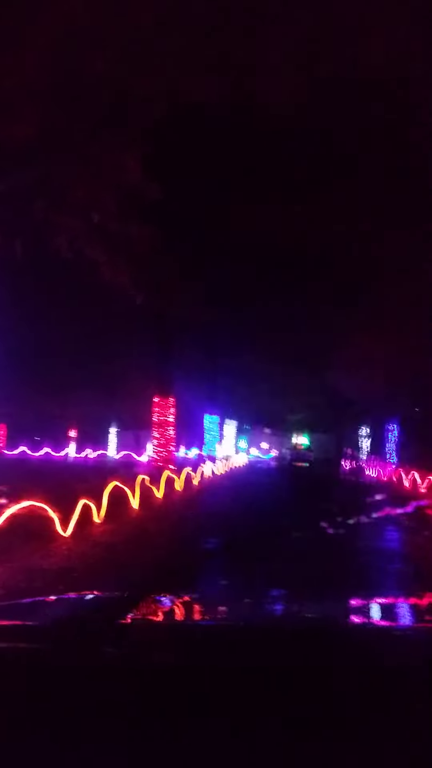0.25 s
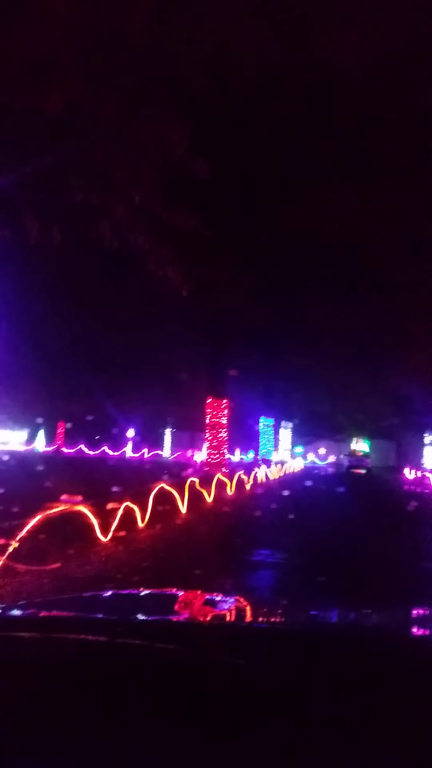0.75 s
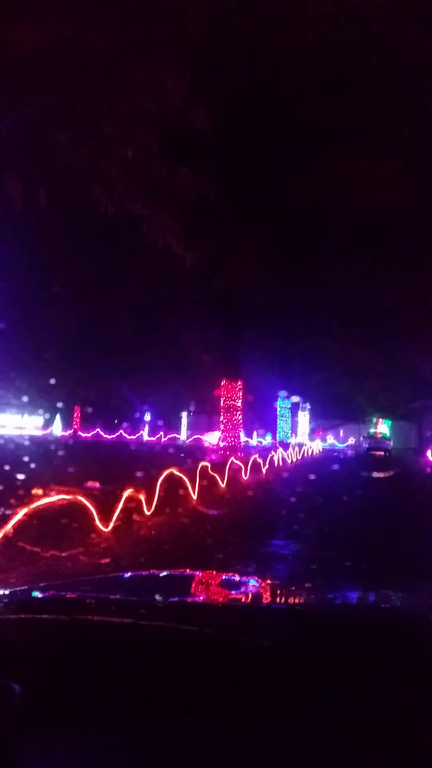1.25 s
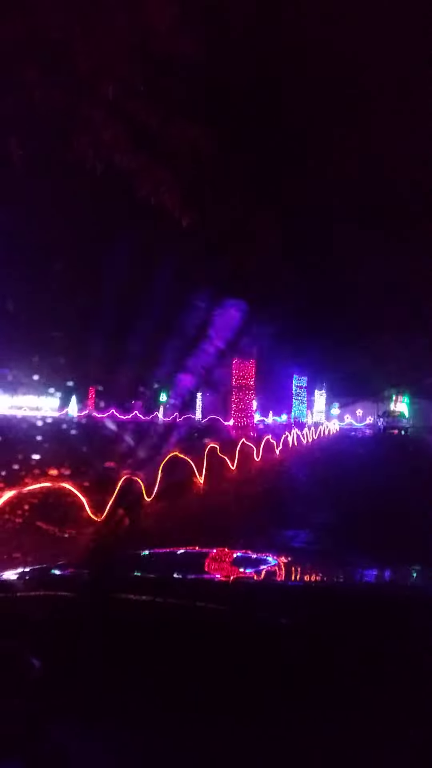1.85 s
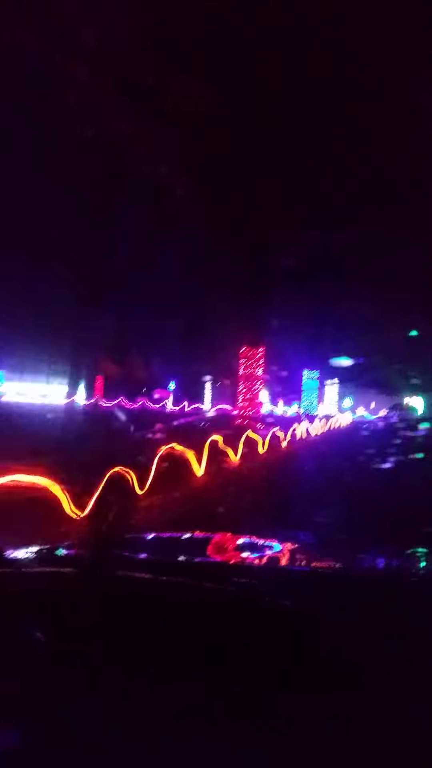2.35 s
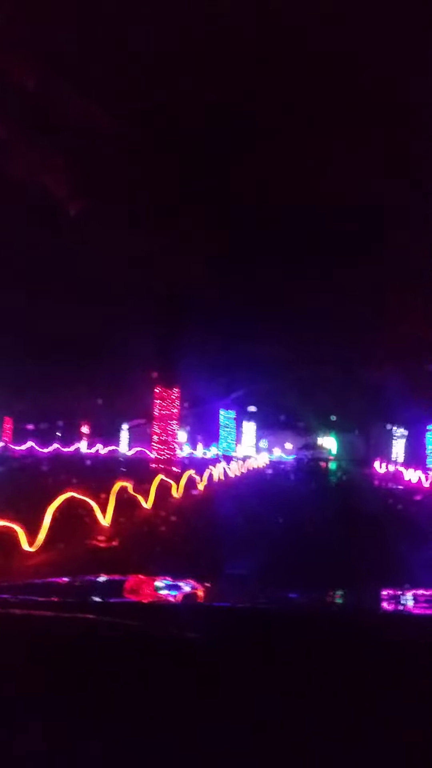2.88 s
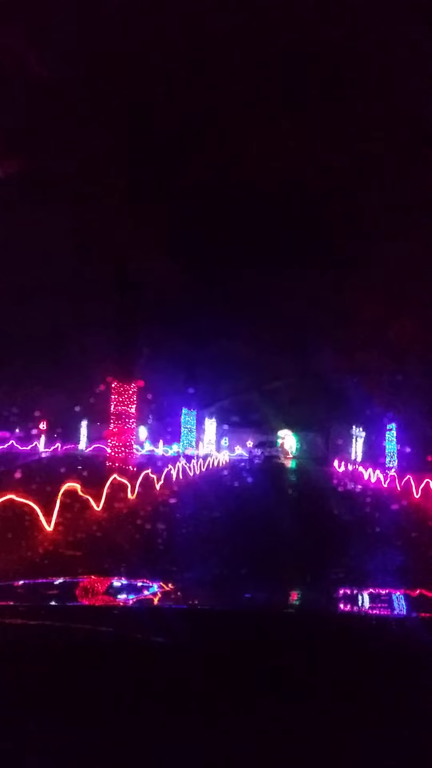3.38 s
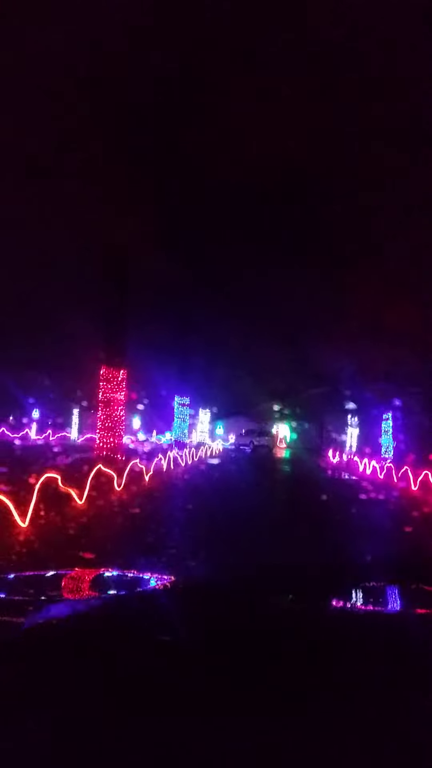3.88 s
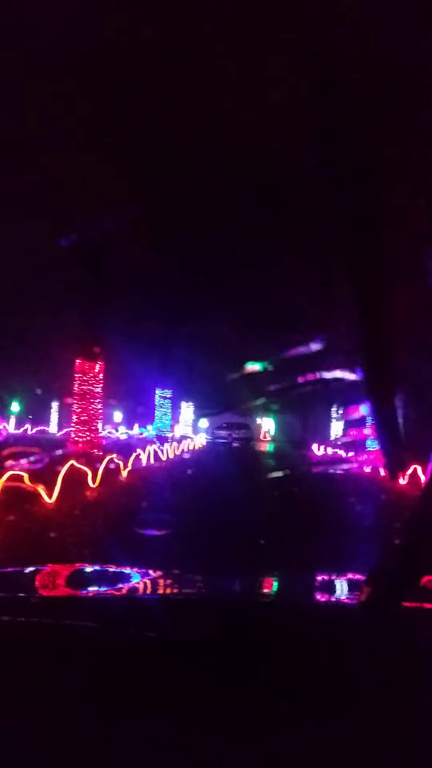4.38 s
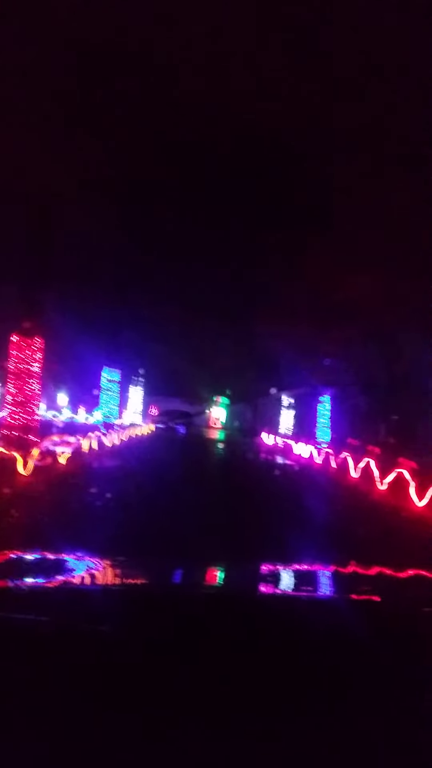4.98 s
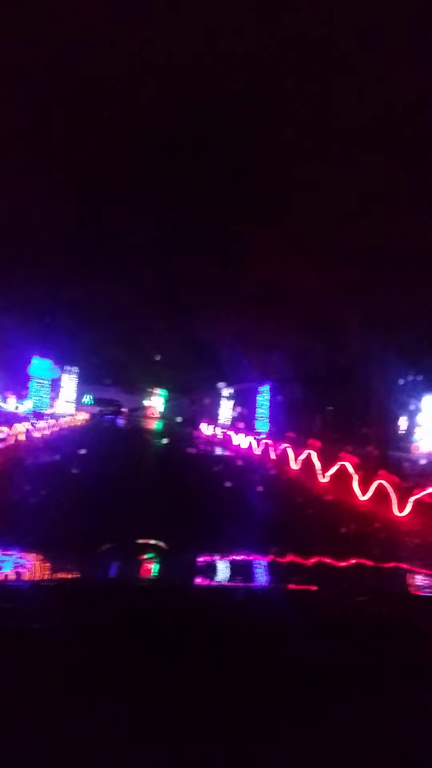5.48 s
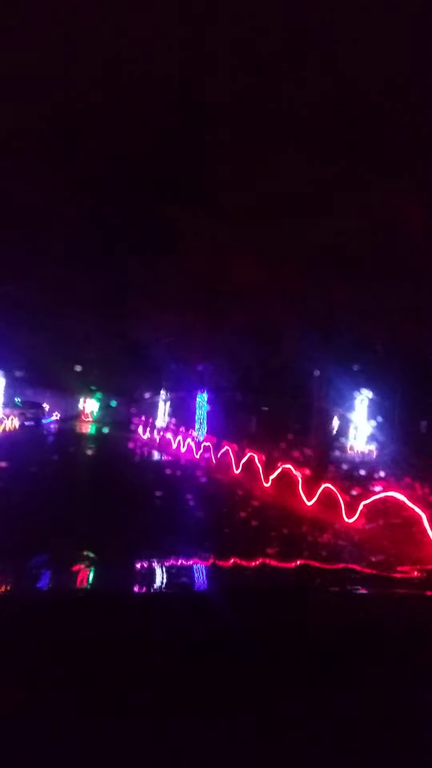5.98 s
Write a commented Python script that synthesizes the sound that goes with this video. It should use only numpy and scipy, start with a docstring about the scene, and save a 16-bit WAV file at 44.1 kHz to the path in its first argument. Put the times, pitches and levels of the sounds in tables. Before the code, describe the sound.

Inside a slowly rolling car in the rain, close and dry, through a small microphone with little deep bass. From 0 s large drops splat irregularly on roof and windscreen, around fifteen to twenty a second, each a tiny spatter with a short thud and panel ring. Fine patter, bright glass ticks and fizz run between them over a faint wash of far rain and road. Around 1.0-1.4 s large hits are sparser. At 1.5 s the wipers groan and sweep low, with dull knocks until 1.7 s and another near 2.0 s. A heavy cluster lands at 2.05-2.2 s, and a strong bright smack at 3.36 s. Wipers groan again at 3.7 s, knocking at 4.2 s. A hollow note rings at 4.6 s, with softer ones near 5.9 s as the wipers set off again. At about 6.1 s a brief gritty swish rises; drops continue to the end at 6.2 s.

```python
"""Large raindrops splat on the roof and windscreen of a slowly rolling car, heard from inside the cabin.
Each is a spatter of noise droplets through thin panels that thud and ring briefly.
Random fine drops patter, tick and fizz between them over a wash of far rain and road.
A few drops ring a hollow note or crack brightly; the wipers groan, sweep and knock softly.
One short swish, noise with two rising resonances, passes near the end."""
import sys
import numpy as np
from scipy import signal
from scipy.fft import rfft, irfft
from scipy.io import wavfile
from scipy.ndimage import uniform_filter1d

SR = 44100
rng = np.random.default_rng(int(sys.argv[2]) if len(sys.argv) > 2 else 0)


def persist_wave(psi):
    """Save psi, clipped to +-1, as 16-bit WAV."""
    counts = np.round(np.clip(psi, -1, 1) * 32767).astype(np.int16)
    wavfile.write(sys.argv[1], SR, np.atleast_2d(counts).T)


def natural_amplitude(level_db):
    """Convert a level in decibels to a linear amplitude factor, elementwise."""
    exponent = np.asarray(level_db, float) / 20
    return 10 ** exponent


N = 274743
SIZE = 16384  # samples in one drop's response
HZ = np.fft.rfftfreq(SIZE, 1 / SR)


def unit_rms(x):
    """Scales to rms 1."""
    return x / np.sqrt(np.mean(x ** 2) + 1e-20)


def read_spectrum(points, hz):
    """Reads a table along a log-frequency axis."""
    table_hz, value = np.transpose(points)
    return np.interp(np.log(hz + 1), np.log(table_hz + 1), value)


def curves(rows):
    """Reads every column after the time at each sample."""
    start_s, *columns = np.transpose(rows)
    t = np.arange(N) / SR
    return [np.interp(t, start_s, column) for column in columns]


def add(mix, start_s, sound):
    """Mixes a sound in at its start time."""
    part = mix[round(start_s * SR):][:len(sound)]
    part += sound[:len(part)]


def causal(db):
    """Minimum-phase response for a gain in dB, so that nothing sounds before the blow."""
    cepstrum = irfft(np.maximum(db, -100) * np.log(10) / 20)
    cepstrum[1:SIZE // 2] *= 2
    cepstrum[SIZE // 2 + 1:] = 0
    return np.exp(rfft(cepstrum))


def coloured_noise(points):
    """Steady noise of rms 1 with the given spectrum."""
    hz = np.fft.rfftfreq(N, 1 / SR)
    white = rfft(rng.standard_normal(N))
    return unit_rms(irfft(white * natural_amplitude(read_spectrum(points, hz)), N))


def resonate(x, hz, width_hz):
    """Shifts the curve hz down to zero, smooths, and shifts back: a resonance of gain 1."""
    turn = np.exp(2j * np.pi * np.cumsum(hz * np.ones(len(x))) / SR)
    r = np.exp(-np.pi * width_hz / SR)
    return 2 * (turn * signal.lfilter([1 - r], [1, -r], x / turn)).real


def random_hits(per_s, spread_db, most):
    """Scatters hits at random samples; exponential sizes in dB make a few larger than the rest."""
    size = natural_amplitude(spread_db * np.minimum(rng.exponential(1, N), most))
    return size * (rng.random(N) < per_s / SR)


# how long the dense ring of a panel lasts: pitch_hz [Hz], t60_s [s]
RING_DECAY = [(150, 0.13), (400, 0.27), (1000, 0.099), (2800, 0.047), (7300, 0.061), (15000, 0.071)]
# low modes of the roof: pitch_hz [Hz], level_db [dB], t60_s [s]
ROOF_MODES = [(137, -7, 0.069), (249, -4.5, 0.13), (398.7, -5, 0.37), (460, 7, 0.058), (716, 9.5, 0.071),
              (813, 11, 0.042)]


def spots(count, direct_db, modes_db):
    """How each spot of the car answers a tap: direct tick, dense ring dying by band, low roof modes."""
    t = np.arange(SIZE) / SR
    hz, frame_s, z = signal.stft(rng.standard_normal((count, SIZE)), SR, nperseg=128)
    t60_s = read_spectrum(RING_DECAY, hz)[:, None]
    dying = z * natural_amplitude(-60 * frame_s / t60_s) / np.sqrt(t60_s)
    answer = signal.istft(dying, SR, nperseg=128)[1][:, :SIZE]
    answer *= 1 - np.exp(-t / 0.0012)  # the ring swells in behind the tick
    answer /= np.linalg.norm(answer, axis=1, keepdims=True)
    answer[:, 0] += natural_amplitude(direct_db)
    for pitch_hz, level_db, mode_t60_s in ROOF_MODES:
        # every spot drives the mode differently and hears it slightly detuned
        share, detune = rng.standard_normal((count, 2)).T[:, :, None]
        fade = natural_amplitude(modes_db + level_db - 60 * t / mode_t60_s)
        answer += share * fade * np.sin(2 * np.pi * pitch_hz * (1 + 0.036 * detune) * t)
    answer[:, SIZE // 2:] = 0
    return rfft(answer)


# fine drops between the large ones: start_s [s], level_db [dB]
PATTER = [(0.0, -43), (0.62, -47.5), (0.78, -45.5), (1.23, -45.5), (1.37, -43.5), (2.15, -45),
          (2.27, -45.5), (3.35, -49.5), (3.45, -53.5), (3.57, -50), (3.71, -45.5), (3.8, -48.5),
          (4.53, -45), (4.68, -47.5), (4.94, -49.5), (5.21, -50), (6.0, -45.5), (6.23, -47)]
# colour of a drop through panel and cabin: pitch_hz [Hz], level_db [dB per Hz]
PANEL = [(35, -41), (60, -66.5), (118, -15.5), (248, -0.5), (435, 3), (588, -4), (760, -1.5), (982, -4),
         (1130, 0), (2220, 2), (2700, -9), (4790, -16.5), (6950, -27), (8200, -29), (15700, -34)]


def patter(answers):
    """Many small drops hit at random moments and spots, each spot with its own brightness."""
    hits = random_hits(per_s=600, spread_db=5.5, most=4)
    spot = rng.integers(0, len(answers), N)
    tilts_db_per_octave = np.linspace(-2.25, 2.25, len(answers))
    panel_db = read_spectrum(PANEL, HZ)
    octaves = np.log2((HZ + 100) / 1500)
    taps = np.zeros(N)
    for k, answer in enumerate(answers):
        response = irfft(answer * causal(panel_db + tilts_db_per_octave[k] * octaves))
        taps += signal.oaconvolve(hits * (spot == k), response)[:N]
    level_db, = curves(PATTER)
    return natural_amplitude(level_db) * unit_rms(taps)


# far rain and road: pitch_hz [Hz], level_db [dB per Hz]
WASH = [(35, -61), (60, -6), (237, 16), (435, 7), (982, 5), (2020, -19), (2440, -18), (4900, -29),
        (7800, -19.5), (15700, -14.5)]


def far_wash():
    """Far rain and road blur into steady coloured noise."""
    return natural_amplitude(-55.5) * coloured_noise(WASH)


# drifting top of the fizz: start_s [s], pitch_hz [Hz]
FIZZ_TOP = [(0, 4940), (2.4, 4730), (4.6, 5800), (6.23, 5700)]


def fizz():
    """The finest drops fizz in clumps on wet glass: short noise tails through two wide resonances."""
    clumps = natural_amplitude(3.0 * unit_rms(uniform_filter1d(rng.standard_normal(N), size=900)))
    hits = clumps * random_hits(per_s=500, spread_db=4.0, most=4)
    t = np.arange(SIZE // 4) / SR
    kind = rng.integers(0, 8, N)
    tails = rng.standard_normal((8, len(t))) * natural_amplitude(-60 * t / 0.06)  # t60 60 ms
    splashes = sum(signal.oaconvolve(hits * (kind == k), tail)[:N] for k, tail in enumerate(tails))
    top_hz, = curves(FIZZ_TOP)
    upper = lower = splashes
    for _ in range(3):  # three passes steepen each resonance
        upper = resonate(upper, top_hz, 1700)
        lower = resonate(lower, 2900, 1900)
    return natural_amplitude(-60.5) * unit_rms(upper + 2.24 * lower)


# modes of the windscreen: pitch_hz [Hz], level_db [dB], t60_s [s]
GLASS_MODES = [(2873, 6.5, 0.025), (3700, -29, 0.0088), (4750, 6, 0.015), (5000, 1.5, 0.014),
               (6000, -11, .008)]


def glass_ticks():
    """Small drops on the windscreen give short bright ticks, each favouring other modes."""
    hits = random_hits(per_s=91, spread_db=9, most=3)
    t = np.arange(SIZE // 8) / SR
    ticks = np.zeros(N)
    for pitch_hz, level_db, t60_s in GLASS_MODES:
        mode = natural_amplitude(level_db - 60 * t / t60_s) * np.sin(2 * np.pi * pitch_hz * t)
        ticks += signal.oaconvolve(hits * rng.standard_normal(N), mode)[:N]
    return natural_amplitude(-61) * unit_rms(ticks)


# large drops: start_s [s], tap_db [dB], thud_db [dB, under 700 Hz], splash_db [dB, over 3.5 kHz],
# length_ms [ms, length of the splat]
DROPS = [(0.053, -42.5, -42, -51, 9.7), (0.084, -50, -78, -65, 8.1), (0.11, -45, -66, -55, 4.9),
         (0.156, -38.5, -59, -41, 1.77), (0.192, -43, -48.5, -53, 27), (0.28, -44, -49, -52, 3.9),
         (0.313, -34.5, -48, -44.5, 6.9), (0.355, -42.5, -43.5, -49.5, 14.7),
         (0.438, -45.5, -54, -52, 1.66), (0.483, -42, -71, -62, 7.1), (0.501, -77, -54, -46.5, 0.55),
         (0.551, -35.0, -40.5, -43.5, 1.9), (0.586, -45, -55, -51, 4.6), (0.624, -45, -52, -54, 2.2),
         (0.638, -45, -52, -55, 25), (0.698, -53, -64, -57, 2), (0.765, -37.5, -46, -45.5, 3.7),
         (0.823, -36, -42, -50, 2.7), (0.862, -45, -40.5, -48, 2.1), (0.881, -37.5, -52, -48, 4.7),
         (0.93, -35.5, -49, -46.5, 3.46), (0.987, -39.5, -52, -47.5, 1.2), (1.001, -44, -48, -52, 15),
         (1.155, -45, -63, -56, 24), (1.165, -50, -50, -58, 1.2), (1.403, -37.5, -48, -46.5, 14.3),
         (1.439, -46, -44, -52, 10.2), (1.457, -32.5, -41, -43.5, 7.7), (1.541, -49, -65, -62, 1.4),
         (1.558, -47.5, -63, -49, 1.8), (1.631, -34.5, -39, -45, 9.8), (1.705, -44.5, -49, -61, 16),
         (1.743, -37, -52, -46.5, 11), (1.857, -57, -65, -59, 1.5), (1.891, -41, -47, -49.5, 1.1),
         (1.949, -41.5, -40, -50, 28), (2.009, -43, -50, -54, 11), (2.031, -45, -53, -59.0, 12),
         (2.058, -33.5, -41, -41.5, 12), (2.085, -35.5, -46.5, -42.5, 8.5),
         (2.102, -30.5, -35.5, -40.5, 5.6), (2.175, -33, -39, -47.5, 7.6), (2.22, -39, -42.5, -50, 8.2),
         (2.287, -52, -55, -60, 1.5), (2.316, -43.5, -51.5, -56, 4.8), (2.487, -34.5, -43.5, -44.0, 10.5),
         (2.555, -50, -44.5, -43.5, 3.7), (2.604, -44.5, -46, -51, 4.8), (2.64, -39.5, -40, -56, 4.4),
         (2.7, -35.5, -46, -49.5, 6), (2.827, -50, -59, -54, 2.3), (2.846, -40.5, -51, -50.0, 12.3),
         (2.881, -41, -46, -52, 4), (2.894, -36.5, -41.5, -46.5, 1.93), (2.942, -35, -40.5, -42, 1.1),
         (3.142, -40.0, -44, -52, 11.6), (3.186, -50, -54, -53.5, 1.4), (3.222, -45.5, -49, -49.5, 13),
         (3.285, -43.5, -49, -53.5, 8.1), (3.362, -28, -36, -39.5, 5.2), (3.407, -35.5, -38.5, -43, 9.3),
         (3.459, -43.5, -45, -51.5, 2.1), (3.496, -34, -43, -42, 7.8), (3.614, -40, -44, -58, 24),
         (3.619, -44, -52, -56, 14), (3.661, -40.5, -42, -52.5, 7.3), (3.707, -40, -41.5, -44.5, 8),
         (3.733, -36.5, -49.5, -48.5, 4.4), (3.759, -47, -45, -57, 6.4), (3.827, -43, -43.5, -52, 1.1),
         (3.838, -39.5, -51, -49, 17), (3.928, -33.0, -37, -40.5, 6.1), (3.964, -40, -48, -52, 21),
         (4.086, -35.5, -41.5, -41.5, 5.5), (4.137, -41, -40, -45.5, 2), (4.178, -41, -44, -52, 10.3),
         (4.398, -54, -48, -55, 1), (4.429, -37.5, -40.5, -48.5, 0.92), (4.471, -41, -48, -48, 8.4),
         (4.513, -34.5, -39.5, -43.5, 3), (4.6, -30, -37.5, -47.5, 4.5), (4.628, -46, -41, -46.5, 2.4),
         (4.662, -40.5, -62.0, -49, 2.9), (4.686, -51, -46, -47.0, 0.22), (4.702, -37, -49.5, -47, 2.1),
         (4.739, -46, -48, -55, 9.1), (4.778, -38.5, -65, -52, 1.3), (4.804, -39.5, -48.5, -51, 12.6),
         (4.831, -43, -50, -53, 4.7), (4.882, -38, -42, -49, 7.2), (4.916, -41.5, -50, -46, 1.32),
         (4.93, -45.5, -51, -50, 2.6), (4.967, -34.5, -46.5, -45, 1.2), (5.004, -39.5, -43, -50, 29),
         (5.055, -35.5, -42.5, -49.5, 8.2), (5.108, -43, -56, -54, 8.8), (5.136, -32.5, -39, -44.5, 9.3),
         (5.228, -45.5, -74, -50.5, 19), (5.267, -53, -60, -58, 2.3), (5.286, -64, -70, -54, 1.6),
         (5.4, -38, -43, -47.5, 1.5), (5.434, -42.5, -45, -47.5, 1.5), (5.467, -34.5, -45, -42.5, 14.7),
         (5.503, -37.5, -51, -46, 7.4), (5.64, -44, -45, -44.5, 0.7), (5.735, -37, -44.5, -46, 9.8),
         (5.802, -45.5, -55, -55, 13), (5.92, -34, -37.5, -45.5, 7.1), (5.924, -42, -49.5, -49.5, 20),
         (6.019, -53, -58, -54, 0.92), (6.105, -33.5, -52, -46, 0.97), (6.151, -42, -48, -64, 9.9),
         (6.214, -34, -39.5, -43.5, 6.3)]


def large_drops(answers):
    """Each drop lands as a spatter of droplets; tap, thud and splash keep their own levels."""
    lead_share = 0.35  # share of the splat that lands before the main body of water
    sharp_db, sharp_ms = -2.5, 3.2  # the shortest drops are mostly one clean tick
    t_ms, out = np.arange(SIZE) / SR * 1000, np.zeros(N)
    low = causal(-10 * np.log10(1 + (HZ / 700) ** 8))
    high = causal(-10 * np.log10(1 + (3500 / (HZ + 1)) ** 8))
    middle = causal(-10 * np.log10((1 + (700 / (HZ + 1)) ** 8) * (1 + (HZ / 3500) ** 8)))
    dull = causal(-10 * np.log10(1 + (HZ / 4500) ** 4))
    panel_db = read_spectrum(PANEL, HZ)
    octaves_up = np.log2(np.maximum(HZ / 6000, 1))
    first_20_ms = slice(0, round(0.02 * SR))  # levels are rms over this stretch
    for k, (start_s, tap_db, thud_db, splash_db, length_ms) in enumerate(DROPS):
        rise_ms, fall_ms = lead_share * length_ms, (1 - lead_share) * length_ms
        after = (t_ms - rise_ms) / np.where(t_ms < rise_ms, rise_ms, fall_ms)
        droplets = rng.standard_normal(SIZE) * natural_amplitude(3.92 * rng.exponential(1, SIZE))
        droplets[round(rise_ms * SR / 1000)] = 11  # the blow of the main body of water
        spatter = rfft(droplets * np.exp(-after ** 2))
        clean_tick = natural_amplitude(sharp_db) * np.exp(-length_ms / sharp_ms) * dull
        struck = spatter * (answers[k % len(answers)] + clean_tick)
        # one smack shakes the panel fairly evenly across the range
        blots_db = 10 * np.log10(uniform_filter1d(abs(struck) ** 2, size=70))
        uneven_db = 0.62 * (blots_db - blots_db.mean())
        # drops with a strong splash also reach further into the top treble
        sparkle_db = 0.076 * (splash_db - tap_db - 12.0) * octaves_up
        struck *= causal(panel_db + sparkle_db - uneven_db)
        tap, thud, splash = [irfft(struck * band) for band in (middle, low, high)]
        splash *= 1 + 1.8 * np.exp(-t_ms / 6.3)  # first contact cracks brightest
        for level_db, part in ((tap_db, tap), (thud_db, thud), (splash_db, splash)):
            add(out, start_s, natural_amplitude(level_db) * part / part[first_20_ms].std())
    return out


# drops on a hollow part of the roof: start_s [s], level_db [dB], pitch_hz [Hz], t60_s [s]
HOLLOW_DROPS = [(0.055, -25.5, 694, 0.04), (4.603, -24.5, 430, 0.15), (5.864, -30, 430, 0.076),
                (5.955, -27.5, 425, 0.058)]


def hollow_drops():
    """A hollow part of the roof rings one clear note: a quick rise, then a decay."""
    t, out = np.arange(SIZE) / SR, np.zeros(N)
    rise = 1 - np.exp(-t / 0.00027)
    for start_s, level_db, pitch_hz, t60_s in HOLLOW_DROPS:
        note = np.sin(2 * np.pi * pitch_hz * t)
        add(out, start_s, rise * natural_amplitude(level_db - 60 * t / t60_s) * note)
    return out


# hard drops near the microphone: start_s [s], level_db [dB, noise rms at the onset]
CRACKS = [(0.156, -40), (0.55, -40), (0.765, -43), (0.93, -40), (0.9862, -49), (1.892, -45), (2.0577, -36),
          (2.083, -37), (2.1011, -38), (2.4876, -39), (2.5536, -44), (2.699, -40), (2.9402, -52),
          (3.3622, -35.5), (3.4955, -41), (3.7055, -39), (3.9275, -37.5), (4.0856, -46), (4.4283, -36.5),
          (4.512, -45), (4.9142, -55), (5.3981, -46), (5.4675, -48), (5.639, -50), (6.2133, -42)]


def cracks():
    """Hard drops crack in the top treble: bright noise that starts at once and dies fast."""
    t, out = np.arange(SIZE // 4) / SR, np.zeros(N)
    bright = signal.butter(4, 9800, "high", fs=SR, output="sos")
    fall_db = -60 * t / 0.011  # t60 11 ms
    for start_s, level_db in CRACKS:
        noise = unit_rms(signal.sosfilt(bright, rng.standard_normal(len(t))))
        add(out, start_s, natural_amplitude(level_db + fall_db) * noise)
    return out


# the wipers set off with a groan and sweep on: start_s [s], level_db [dB]
WIPES = [(1.529, -42), (3.72, -41.5), (5.919, -43.5)]


def wiper_rumble():
    """The wiper motor shakes the three lowest roof modes: a quick groan, then a softer sweep."""
    rise_s, fall_db_per_s = 0.0063, 200
    sweep_db, sweep_s, stop_s = -7, 0.2, 0.055  # relative to the groan; hold, then fade constant
    shake, t = rng.standard_normal(N), np.arange(N) / SR
    body, level = np.zeros(N), np.zeros(N)
    for pitch_hz, mode_db, _ in ROOF_MODES[:3]:
        mode = resonate(resonate(shake, pitch_hz, 45), pitch_hz, 45)
        body += natural_amplitude(mode_db) * unit_rms(mode)
    for start_s, level_db in WIPES:
        since = np.maximum(t - start_s, 0)
        rise = np.minimum(since / rise_s, 1)
        groan = natural_amplitude(-fall_db_per_s * since)
        sweep = natural_amplitude(sweep_db) * np.exp(-np.maximum(since - sweep_s, 0) / stop_s)
        level += natural_amplitude(level_db) * rise * (groan + sweep)
    return level * unit_rms(body)


# blades knock where they turn and judder as they set off: peak_s [s], level_db [dB, of the push]
KNOCKS = [(1.5403, -34.5), (1.552, -31), (1.5612, -28.5), (1.572, -39), (1.658, -30.5), (1.711, -38),
          (1.9707, -28.5), (3.739, -36), (3.754, -32), (3.771, -32), (4.172, -28)]


def wiper_knocks():
    """A dull push of a cycle and a half sets the roof modes ringing."""
    push_hz, push_ms, ring_db = 318, 1.85, -50.5
    early_s = 0.005  # the push begins this long before its peak
    t, out = np.arange(SIZE) / SR, np.zeros(N)
    from_peak_s = t - early_s
    push = -np.cos(2 * np.pi * push_hz * from_peak_s) * np.exp(-(from_peak_s * 1000 / push_ms) ** 2)
    modes = sum(natural_amplitude(level_db - 60 * t / t60_s) * np.cos(2 * np.pi * pitch_hz * t)
                for pitch_hz, level_db, t60_s in ROOF_MODES)
    knock = push + natural_amplitude(ring_db) * signal.oaconvolve(push, modes)[:SIZE]
    for peak_s, level_db in KNOCKS:
        add(out, peak_s - early_s, natural_amplitude(level_db) * knock)
    return out


# the swish: start_s [s], level_db [dB], lower_hz [Hz], upper_hz [Hz] (its two sliding resonances)
SWISH = [(6.04, -50, 1250, 4700), (6.06, -38, 1390, 4700), (6.085, -36.5, 1970, 4830),
         (6.108, -29.5, 2900, 5300), (6.12, -38, 3740, 6270), (6.135, -36.5, 4870, 7560),
         (6.155, -49, 5650, 9000)]
# its airy noise: pitch_hz [Hz], level_db [dB per Hz]
SWISH_AIR = [(470, -37), (800, -3.5), (2580, -6), (3150, -8), (3520, -1.5), (12200, -24.5), (15700, -22)]


def swish():
    """A short gritty hiss with two resonances sliding upward and a fixed bright one."""
    level_db, lower_hz, upper_hz = curves(SWISH)
    grit_db = 1.2 * unit_rms(uniform_filter1d(rng.standard_normal(N), 40))
    air = coloured_noise(SWISH_AIR) * natural_amplitude(grit_db)
    first_s, last_s = SWISH[0][0], SWISH[-1][0]
    gate = np.interp(np.arange(N) / SR, [first_s - 0.01, first_s, last_s, last_s + 0.01], [0, 1, 1, 0])
    hiss = air + 7.6 * resonate(air, lower_hz, 330)
    hiss += 3.1 * resonate(air, upper_hz, 600)
    hiss += 2.1 * resonate(air, 10600, 2000)
    return gate * natural_amplitude(level_db) * unit_rms(hiss)


def scene():
    """All sounds inside the cabin; the far wash and the fizz follow the fine rain part of the way."""
    fine = patter(spots(count=12, direct_db=-11.5, modes_db=-49))
    fine_db, = curves(PATTER)
    follow = natural_amplitude(0.84 * (fine_db - fine_db.mean()))
    background = follow * (far_wash() + fizz())
    large = large_drops(spots(count=40, direct_db=-3.5, modes_db=-49.5))
    rain = fine + background + glass_ticks() + large + hollow_drops() + cracks()
    wipers = wiper_rumble() + wiper_knocks()
    return (rain + wipers + swish())[None]


# faint low noise of the electronics: pitch_hz [Hz], level_db [dB per Hz]
HISS = [(25, 2), (70, 7), (120, -30), (15700, -60)]


def electronics_noise():
    """The electronics add a faint, mostly low steady noise."""
    return natural_amplitude(-91) * coloured_noise(HISS)


def low_pass(x):
    """Removes everything above the highest recorded frequency."""
    return signal.sosfilt(signal.butter(12, 16640, fs=SR, output="sos"), x)


def record(dry):
    """A small microphone drops the deep bass and the top treble and adds its faint noise."""
    thin = signal.sosfilt(signal.butter(4, 100, "high", fs=SR, output="sos"), dry)
    treble_cut = signal.firwin(255, 15900, window=("kaiser", 4), fs=SR)
    thin = signal.oaconvolve(thin, treble_cut[None], "same")
    mix = thin + electronics_noise()
    return low_pass(mix)


dry = scene()
out = record(dry)
persist_wave(out)
```